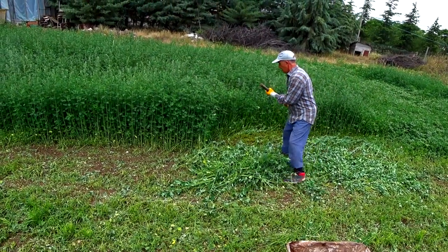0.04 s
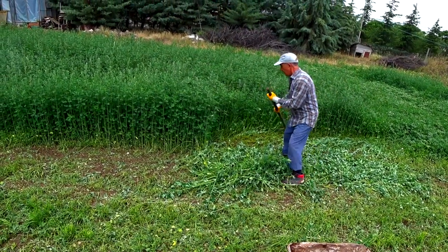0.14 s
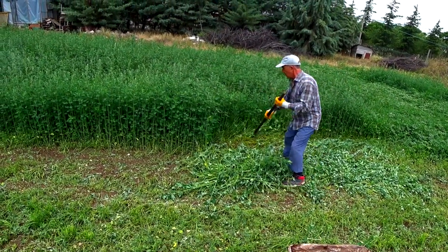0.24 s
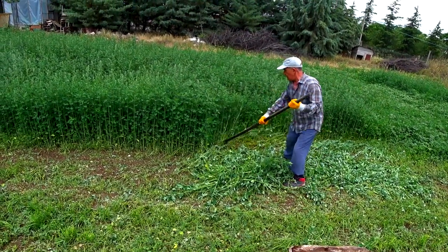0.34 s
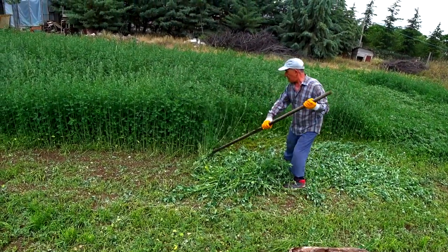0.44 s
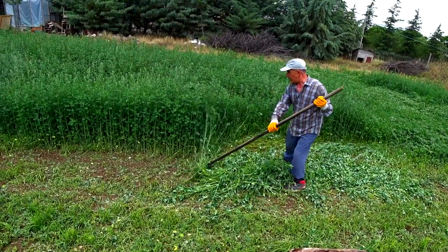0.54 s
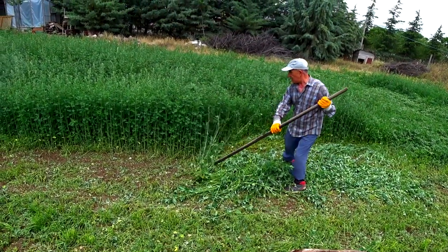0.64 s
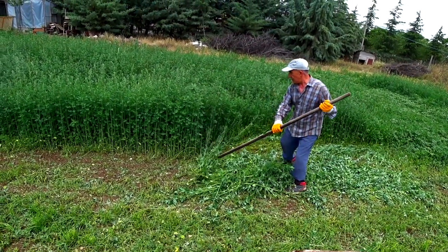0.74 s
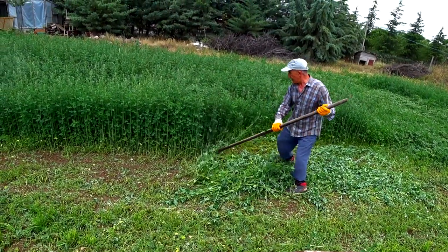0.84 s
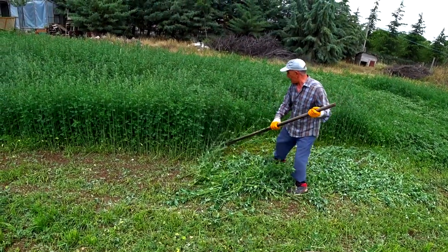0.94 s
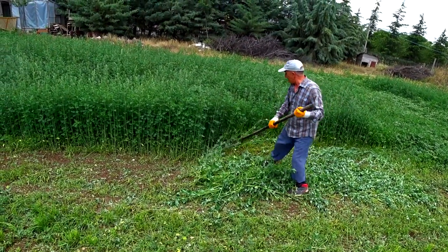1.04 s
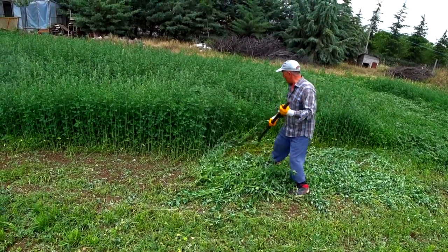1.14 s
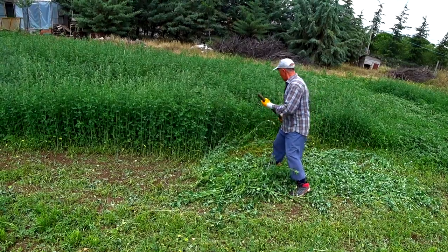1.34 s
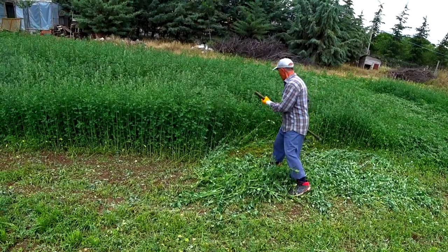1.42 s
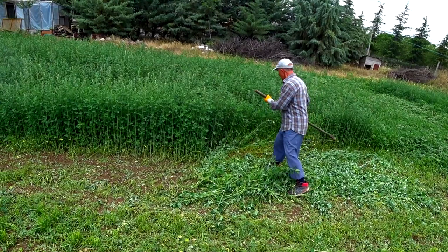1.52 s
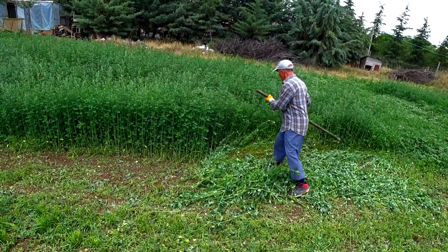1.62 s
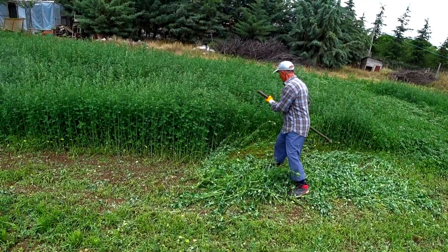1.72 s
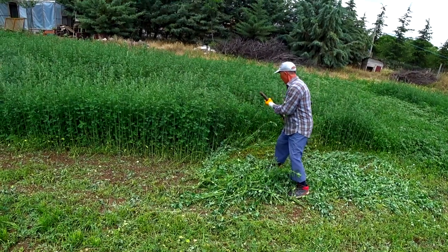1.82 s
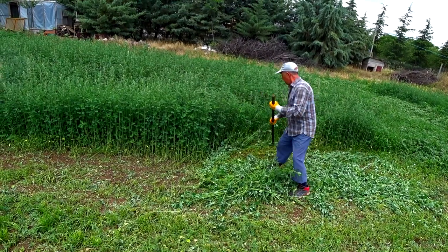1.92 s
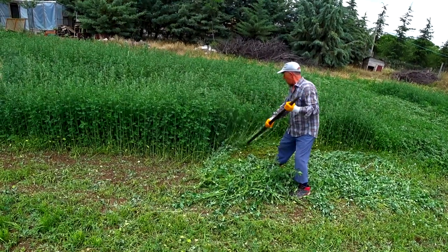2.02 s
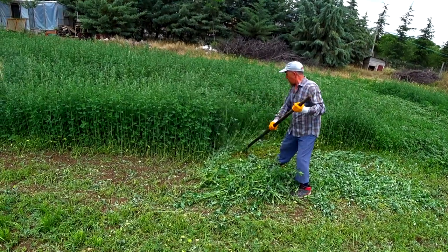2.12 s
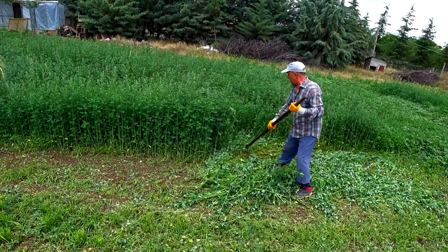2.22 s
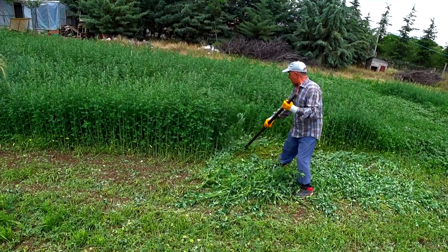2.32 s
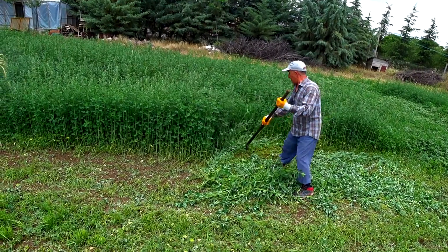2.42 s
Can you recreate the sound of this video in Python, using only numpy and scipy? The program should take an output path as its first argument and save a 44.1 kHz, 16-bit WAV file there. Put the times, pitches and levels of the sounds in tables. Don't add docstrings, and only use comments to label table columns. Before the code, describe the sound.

A hand scythe slices twice through tall fresh grass, stems snapping, faint birds chirping in an open field

```python
import sys
import numpy as np
from scipy import signal
from scipy.fft import rfft, irfft, next_fast_len
from scipy.io import wavfile
from scipy.ndimage import map_coordinates

SR = 44100
rng = np.random.default_rng(int(sys.argv[2]) if len(sys.argv) > 2 else 0)


def field_ratio(decibels):
    return 10 ** (np.asarray(decibels, dtype=float) / 20)


def dump(signal):
    limited = np.clip(np.atleast_2d(signal).T, -1, 1)
    pcm = np.round(limited * 32767).astype(np.int16)
    wavfile.write(sys.argv[1], SR, pcm)


N = 108045
T = np.arange(N) / SR


def unit(x):
    return x / np.sqrt(np.mean(x ** 2) + 1e-20)


def along(points, hz):
    f, v = np.transpose(points)
    return np.interp(np.log(hz + 1), np.log(f + 1), v)


def curves(rows):
    s, *columns = np.transpose(rows)
    return [np.interp(T, s, column) for column in columns]


def wobble(rate):
    knots = rng.standard_normal(int(N * rate / SR) + 4)
    return map_coordinates(knots, [np.arange(N) * rate / SR])


def filtered(x, response):
    m = next_fast_len(N + 8192)
    return irfft(rfft(x, m) * response(np.fft.rfftfreq(m, 1 / SR)), m)[..., :N]


def humps(rows):
    return lambda f: field_ratio(sum(db * np.exp(-((f - hz) / width) ** 2) for hz, width, db in rows))


def band(hz, width_hz):
    noise = rng.standard_normal(N)
    return unit(filtered(noise, lambda f: np.exp(-((f - hz) / width_hz) ** 2)))


def overlay(s, waves):
    size = waves.shape[1]
    at = (s * SR).astype(int)[:, None] + np.arange(size)
    return np.bincount(at.ravel(), waves.ravel(), N + size)[:N]


def rings(s, db, hz, cycles, size):
    t = np.arange(size) / SR
    decay = np.exp(-t * hz[:, None] / cycles)
    return overlay(s, field_ratio(db)[:, None] * np.sin(2 * np.pi * hz[:, None] * t) * decay)


def crackle(spectrum, clump_db, grain_db, spike_db, count):
    draw = rng.random((count, 3))
    grain_s, grain_hz = draw[:, 0] * (N - 1) / SR, 3000 + 12500 * draw[:, 2]
    peak_db = -spike_db * np.log(draw[:, 1] + 0.013)
    grains = rings(grain_s, peak_db, grain_hz, cycles=5.4, size=200)
    clumps = field_ratio(clump_db * (wobble(150) + wobble(40.1)))
    rough = (rng.standard_normal(N) + field_ratio(grain_db) * unit(grains)) * clumps
    return unit(filtered(rough, lambda hz: field_ratio(along(spectrum, hz))))


def spread(x, alike, pan=((1, 0),), smear_s=0.024):
    t = T[:int(4 * smear_s * SR)]
    smear = rng.standard_normal(len(t)) * np.exp(-t / smear_s)
    copy = signal.fftconvolve(x, smear / np.linalg.norm(smear))[:N]

    def mid_side(hz):
        turn = np.arccos(np.clip(along(alike, hz), -1, 1)) / 2
        return np.array([np.cos(turn), np.sin(turn)])

    mid, side = filtered(np.array([x, copy]), mid_side)
    left_right = np.array([mid + side, mid - side])
    return filtered(left_right, lambda hz: field_ratio(along(pan, hz) * np.array([[1], [-1]])))


# time in seconds, level in dB.
RUSTLE_LEVEL = [(0, -49), (.04, -53), (.14, -49), (.17, -57), (.22, -57.5), (.7, -50), (.78, -54),
                (.9, -51.5), (.94, -55.5), (1.1, -49.5), (1.3, -60), (1.45, -59.5), (1.75, -72), (1.8, -61),
                (1.9, -69.5), (2.2, -49), (2.38, -54), (2.43, -51)]
# pitch in Hz, level in dB per Hz.
SETTLE_COLOUR = [(300, -2.5), (560, -10), (900, -7), (2000, -13), (3500, -11), (8000, -11.5),
                 (11000, -14.5), (15800, -15)]


def settling():
    level_db, = curves(RUSTLE_LEVEL)
    brushes = crackle(SETTLE_COLOUR, clump_db=1.15, grain_db=-7, spike_db=4.0, count=9000)
    return field_ratio(level_db + 0.6 * wobble(13.245)) * brushes


# pitch in Hz, level in dB per Hz.
RUMBLE_COLOUR = [(12, -40), (28, -9.5), (50, -2), (66, -9.5), (126, -18), (280, -17.5), (380, -23.5),
                 (600, -39.5)]
# pitch in Hz, width in Hz, level in dB.
MOTOR_LINES = [
    (51, 10, -68.5),
    (98, 6.164, -61.5),
]
# time in seconds, drone level in dB, rumble level in dB.
TRAFFIC_LEVEL = [
    (0, -66.5, -54),
    (.3, -60.5, -56.5),
    (.6, -84, -55),
    (1.3, -62, -53),
    (1.75, -65, -54.5),
    (2.0, -67, -54.5),
    (2.25, -60, -53.5),
    (2.45, -58, -59),
]


def traffic():
    drone_db, rumble_db = curves(TRAFFIC_LEVEL)
    rolling = crackle(RUMBLE_COLOUR, clump_db=0.75, grain_db=-40, spike_db=0, count=9)
    rumble = field_ratio(rumble_db + 1.3 * wobble(2.6)) * rolling
    hum = sum(field_ratio(db) * band(hz, width) for hz, width, db in MOTOR_LINES)
    drone = field_ratio(drone_db) * band(hz=232.5, width_hz=60)
    return rumble + hum + drone


# pitch in Hz, level in dB per Hz.
HISS_COLOUR = [(250, -19), (450, 8), (1000, 5.5), (2500, -2), (6000, -6), (15800, -47), (17000, -48.5)]


def hiss():
    air = crackle(HISS_COLOUR, clump_db=2.7, grain_db=-40, spike_db=-1, count=9)
    return field_ratio(-59.5 + 0.46 * wobble(6.8)) * air


# pitch in Hz, likeness (1 is the same).
ALIKE_FAR_AWAY = [(30, .999), (80, 1), (200, 0.95), (400, 0.058), (2000, 0.043), (5000, 0.17),
                  (12000, 0.45)]


def field():
    return spread(traffic() + hiss(), ALIKE_FAR_AWAY, smear_s=0.082)


# time in seconds, peak in dB,
# pitch in Hz.
STEM_SNAPS = [(0.0895, -32.5, 1920), (0.1301, -29.5, 10900), (0.2327, -26, 10400), (0.2787, -28, 3500),
              (0.3073, -32.5, 2320), (0.3116, -21, 9690), (0.3394, -18.5, 9600), (0.3587, -18, 10260),
              (0.3816, -20, 7260), (0.5013, -17, 2490), (0.5096, -24.5, 2450), (0.528, -23.5, 1730),
              (0.5907, -14.5, 7700), (0.596, -16, 6950), (0.851, -38.5, 2578), (0.8904, -32, 4700),
              (0.951, -36.5, 2600), (1.3047, -35, 6600), (1.78, -42, 8500), (1.972, -34, 2500),
              (1.9848, -20, 7200), (1.9981, -21, 7150), (2.0148, -24, 7220), (2.0355, -20, 10800),
              (2.049, -20, 11100), (2.0705, -25.5, 2300), (2.0875, -20, 7240), (2.107, -20.5, 7200),
              (2.133, -19, 7248), (2.4085, -40, 6460), (2.4285, -45, 9600),
              (0.5017, -12, 9800),
    (.599, -29, 10100),
]


def snaps():
    s, db, hz = np.transpose(STEM_SNAPS)
    s, db = s + .0008, db - 8
    t, f = np.arange(512) / SR, np.fft.rfftfreq(512, 1 / SR)
    colour = 0.45 + 0.49 * np.exp(-(np.log((f + 1) / hz[:, None]) / 0.57) ** 2)
    noise = irfft(rfft(rng.standard_normal((len(s), 512))) * colour * f / (f + 1500))
    attack, decay_s = 1 - np.exp(-t / 0.00062), .011
    crack = field_ratio(db[:, None] + 5 - 60 * t / decay_s) * attack * noise
    return rings(s, db, hz, cycles=5, size=600) + overlay(s, crack)


# start in seconds, end in seconds, level in dB, pitch in Hz, width in Hz.
BLADE_BRUSH = (.175, .31, -58, 3250, 220)


def scrape():
    start, end, db, hz, width = BLADE_BRUSH
    swell = np.sin(np.pi * np.clip((T - start) / (end - start), 0, 1))
    return field_ratio(db + 3.854 * wobble(52.3)) * swell * (band(hz, width) + band(2 * hz / 3, width))


# pitch in Hz, level in dB per Hz.
CUT_COLOUR = [(90, -15.5), (300, -18.5), (560, -9.5), (900, -12), (1500, -17), (3600, -18), (6000, -13),
              (15800, -14)]
# time in seconds, cut level in dB, blade ring level in dB, ring pitch in Hz.
FIRST_SWEEP = [
    (.2, -51, -57.5, 774),
    (.295, -45, -85, 824),
    (.31, -42, -53.5, 794),
    (.36, -36.5, -51.5, 810),
    (.4, -35, -42, 940),
    (.45, -33.5, -44, 1200),
    (.51, -36, -40, 2000),
    (.575, -40.5, -53.5, 2200),
    (.69, -52.5, -72, 2200),
]
# time in seconds, cut level in dB, blade ring level in dB, ring pitch in Hz.
SECOND_SWEEP = [
    (1.94, -57, -65, 885),
    (1.972, -47, -53, 850),
    (1.99, -39.5, -45, 920),
    (2.02, -38, -50.5, 1180),
    (2.1, -34, -43, 880),
    (2.135, -40.5, -53, 1090),
    (2.15, -42.5, -54, 1000),
    (2.25, -59.5, -86, 1033),
]


def stroke(rows):
    cut_db, ring_db, ring_hz = curves(rows)
    first_s, last_s, fade_s = rows[0][0], rows[-1][0], .06
    fade_in = np.clip(1 + 2 * (T - first_s) / fade_s, 0, 1)
    fade_out = np.clip((last_s + fade_s - T) / fade_s, 0, 1)
    draw = rng.random((6000, 3))
    s = draw[:, 0] * (N - 1) / SR
    hz = ring_hz[(s * SR).astype(int)] * np.exp(0.82 * (draw[:, 1] - .5))
    ring = unit(rings(s, -2 * np.log(draw[:, 2] + 0.041), hz, cycles=2.4, size=900))
    cut = crackle(CUT_COLOUR, clump_db=1.08, grain_db=-2.5, spike_db=2.0, count=9000)
    return fade_in * fade_out * (field_ratio(cut_db) * cut + field_ratio(ring_db + 1.1 * wobble(90)) * ring)


# time in seconds, peak in dB, pitch in Hz.
BLADE_KNOCKS = [(.378, -31, 975), (.388, -35.5, 850), (.395, -33, 895), (.404, -31.5, 910), (.42, -44, 904),
                (.442, -31.5, 944), (.452, -31, 1340), (.462, -36, 1510), (.47, -33.5, 2300),
                (0.516, -32, 2500), (.53, -28, 3080), (.562, -38, 2300), (2.009, -34, 3100),
                (2.015, -32.5, 3140), (2.015, -32.5, 1360), (2.033, -35.5, 855), (2.042, -41, 900),
                (2.053, -34.5, 2200), (2.075, -35.5, 895), (2.106, -34.5, 1012), (2.135, -38.5, 1310),
                (2.155, -42, 1000)]


def knocks():
    s, db, hz = np.transpose(BLADE_KNOCKS)
    return rings(s, db, hz, cycles=4.86, size=1200)


# time in seconds, level in dB, pitch in Hz, length in seconds.
GROUND_THUDS = [
    (0.745, -50, 180, 0.016),
    (0.778, -48, 120, 0.029),
    (0.775, -55, 280, 0.027),
    (0.825, -50.5, 150, 0.023),
    (0.87, -52, 120, 0.019),
    (2.09, -48, 300, 0.03),
    (0.481, -45.5, 145, 0.027),
    (2.4, -58, 240, 0.031),
    (0.516, -43, 300, 0.021),
]


def thuds():
    return sum(field_ratio(db) * np.exp(-((T - s) / length) ** 2) * band(hz, .9 * hz)
               for s, db, hz, length in GROUND_THUDS)


# pitch in Hz, width in Hz, gain in dB.
GROUND_ECHO = [(570, 85, -12), (1210, 160, -3.5), (2200, 810, 3), (8900, 200, -0.5), (5100, 440, 1.5)]
# pitch in Hz, half the difference in dB.
GRASS_LEAN = [(500, .2), (2000, .3), (2800, .05), (6500, .05), (8500, 1.1), (13000, 1.1)]
# pitch in Hz, likeness (1 is the same).
ALIKE_AT_BLADE = [(100, .99), (600, .98), (1000, .92), (1700, .95), (2200, .999), (16000, .9995)]
# pitch in Hz, likeness (1 is the same).
ALIKE_SCATTERED = [(300, .9), (1500, .8), (3500, .92), (5000, .985), (6500, .998), (16000, .995)]
# time in seconds, width in seconds, half the left-right difference in dB.
SWING_LEFT = (.5, .06, .9)


def grass():
    loose = filtered(settling(), humps(GROUND_ECHO))
    blade = snaps() + scrape() + stroke(FIRST_SWEEP) + stroke(SECOND_SWEEP) + knocks() + thuds()
    near = filtered(blade, humps(GROUND_ECHO))
    s, width, lean_db = SWING_LEFT
    swing_db = lean_db * np.exp(-((T - s) / width) ** 2) * np.array([[1], [-1]])
    return field_ratio(swing_db) * spread(near, ALIKE_AT_BLADE, GRASS_LEAN) + spread(loose, ALIKE_SCATTERED, GRASS_LEAN)


# time in seconds, level in dB, start pitch in Hz, end pitch in Hz, length in seconds.
CLEAR_CHIRPS = [(1.1, -62, 5600, 9700, 0.013), (1.7, -61, 2500, 4200, 0.0154),
                (1.222, -56, 5100, 5300, 0.014), (1.1, -60, 5800, 4500, 0.013),
                (2.29, -71, 4600, 7600, .04), (2.272, -60, 4400, 3950, .028),
                (1.343, -74, 4800, 4874, .012), (1.368, -66, 7500, 4500, 0.0073),
                (1.739, -68, 3400, 4500, 0.016), (1.757, -65, 4372, 3700, 0.012),
                (1.787, -67.5, 3143, 3360, 0.026), (0.78, -67, 4000, 3020, 0.032)]


def chirps():
    x = np.zeros(N)
    for s, db, start_hz, end_hz, length in CLEAR_CHIRPS:
        u = np.clip((T - s) / length, 0, 1)
        cycles = length * (start_hz * u + (end_hz - start_hz) * u * u / 2)
        x += field_ratio(db + 4.5) * np.sin(np.pi * u) * np.sin(2 * np.pi * cycles)
    return x


# time in seconds, level in dB, length in seconds, first pitch in Hz.
HOARSE_CALLS = [
    (1.074, -56, 0.13, 5550),
    (1.453, -54.5, 0.13, 5480),
    (2.256, -51, 0.08, 5830),
]


def calls():
    x, width_hz = np.zeros(N), 320
    for s, db, length, first_hz in HOARSE_CALLS:
        u = np.clip(T - s, 0, None)
        shape = np.minimum(u / .011, 1) * np.exp(-u / (.22 * length))
        voice = band(first_hz, width_hz / 2) + field_ratio(-5) * band(5000, width_hz / 2)
        high = field_ratio(3.1 * wobble(90)) * shape * voice
        late = np.sin(np.pi * np.clip((u - .018) / length, 0, 1))
        trill = band(3820, width_hz) + band(4500, 2 * width_hz)
        low = field_ratio(4.9 * wobble(60)) * late * trill
        x += field_ratio(db) * (high + field_ratio(-11) * low)
    return x


def birds():
    x = chirps() + calls()
    echo_s, wet_db, pan_db = .35, -5, 3
    tail = rng.standard_normal((2, SR // 4)) * field_ratio(-60 * T[:SR // 4] / echo_s)
    wet = signal.fftconvolve(x[None], tail / np.linalg.norm(tail[0]), axes=1)[:, :N]
    return (x + field_ratio(wet_db) * wet) * field_ratio([[pan_db / 2], [-pan_db]])


def scene():
    return grass() + field() + birds()


# pitch in Hz, width in Hz, gain in dB.
CAPSULE = [(7610, 620, 3.5), (10550, 1040, 4.5), (15900, 870, -8)]


def microphone(dry):
    return filtered(dry, lambda f: humps(CAPSULE)(f) * (f < 15790))


def low_pass(x):
    return signal.sosfilt(signal.butter(12, 16250, fs=SR, output="sos"), x)


def record(dry):
    mix = microphone(dry)
    return low_pass(mix)


dry = scene()
out = record(dry)
dump(out)
```